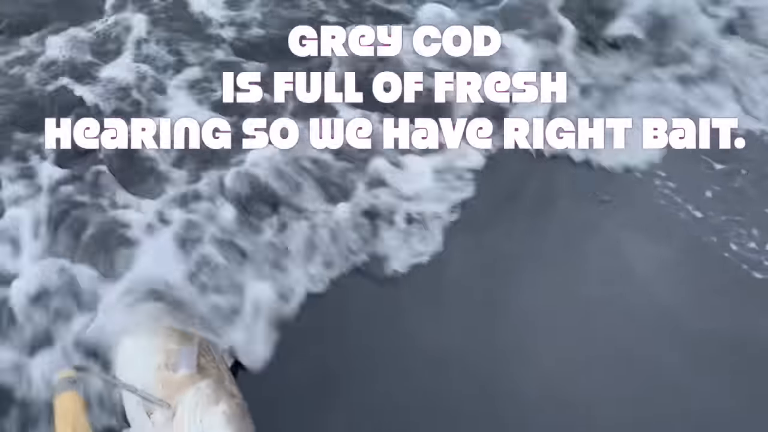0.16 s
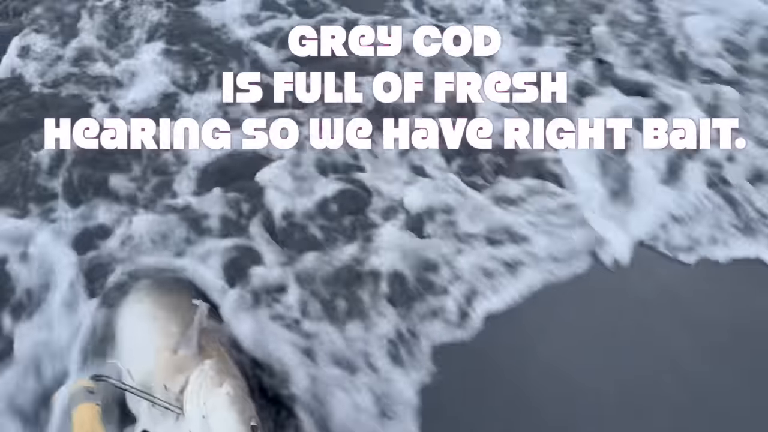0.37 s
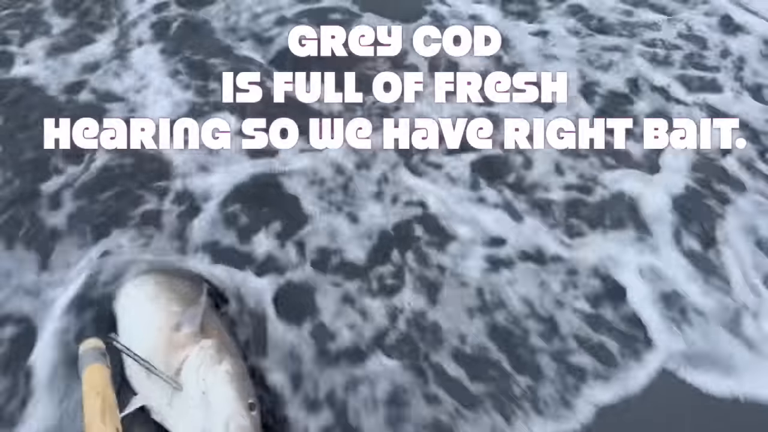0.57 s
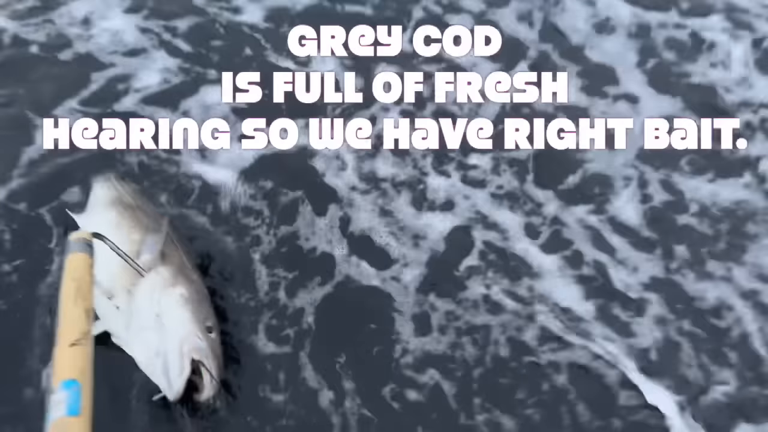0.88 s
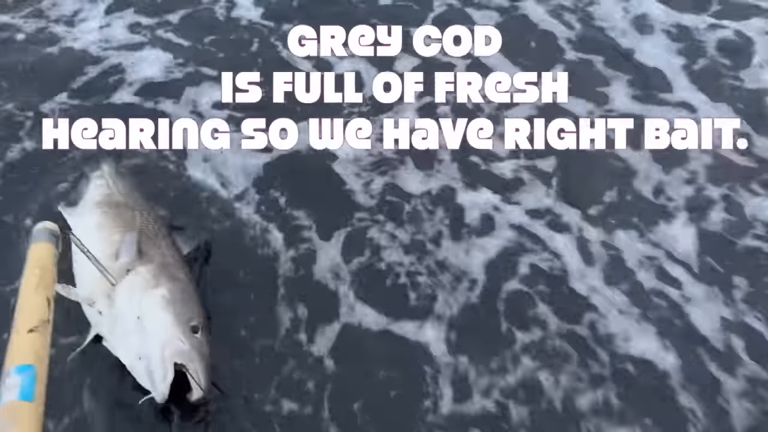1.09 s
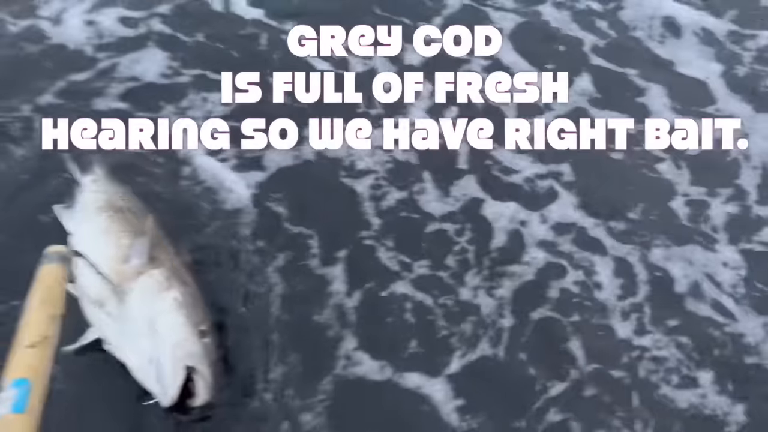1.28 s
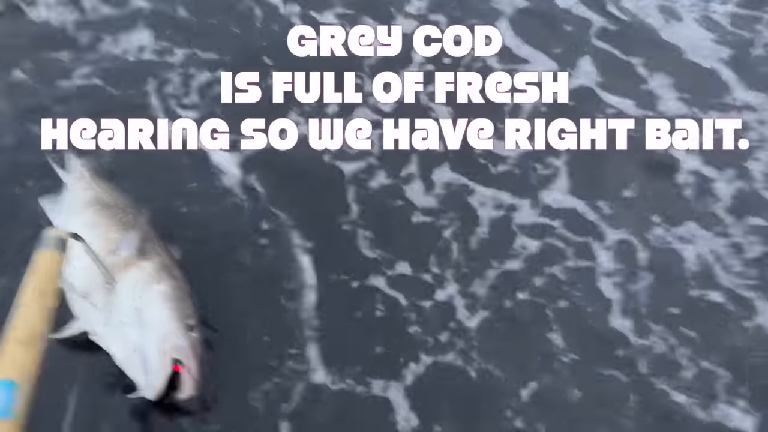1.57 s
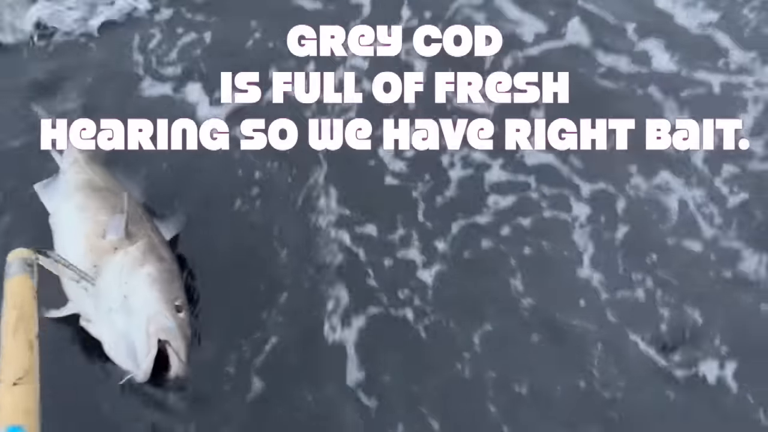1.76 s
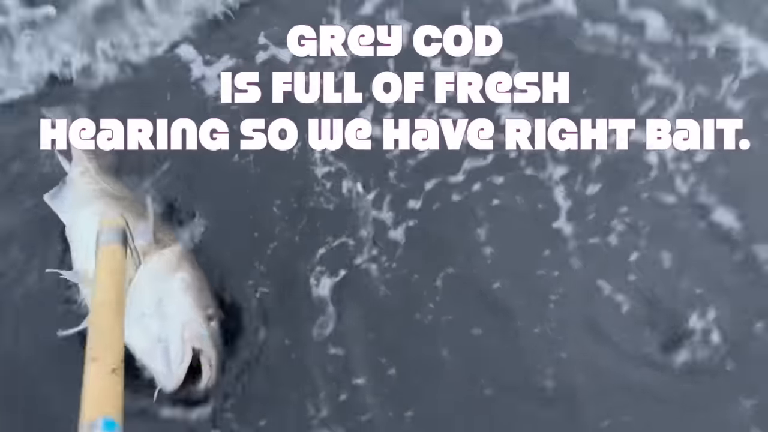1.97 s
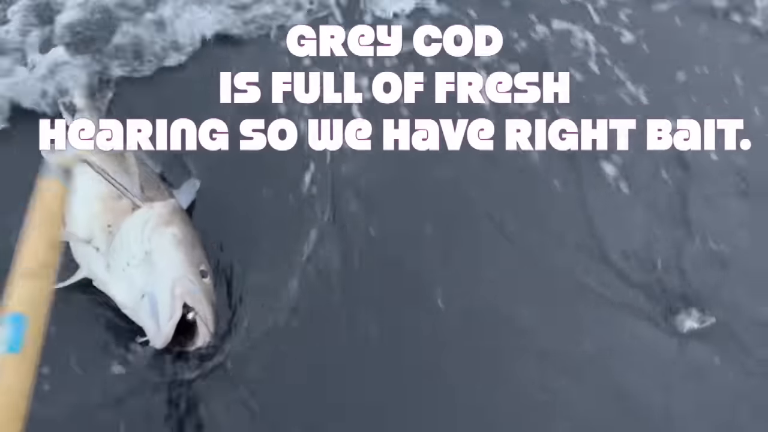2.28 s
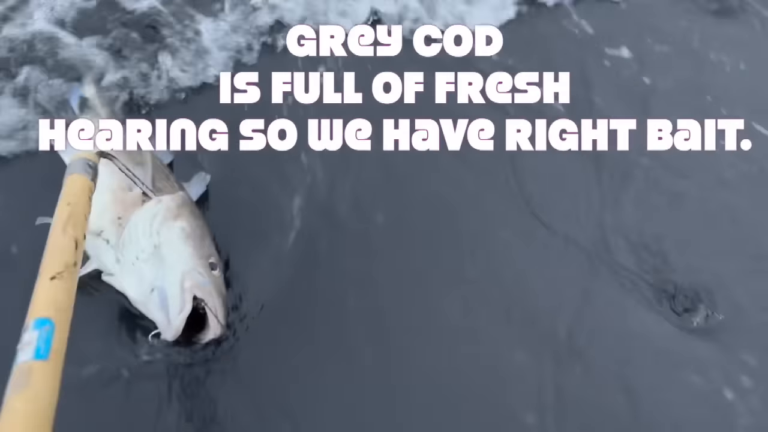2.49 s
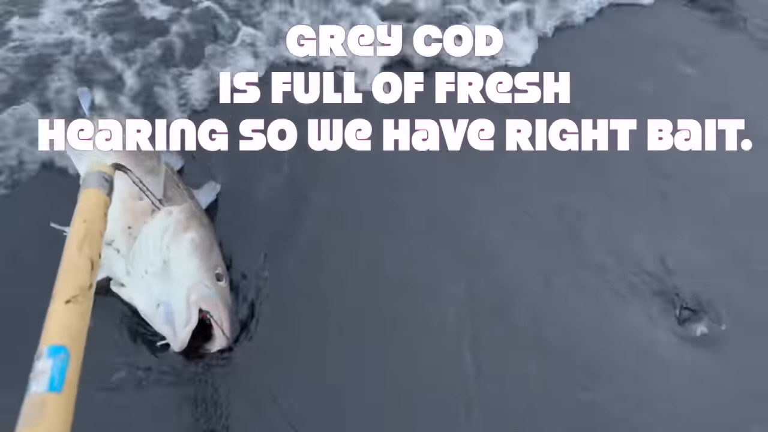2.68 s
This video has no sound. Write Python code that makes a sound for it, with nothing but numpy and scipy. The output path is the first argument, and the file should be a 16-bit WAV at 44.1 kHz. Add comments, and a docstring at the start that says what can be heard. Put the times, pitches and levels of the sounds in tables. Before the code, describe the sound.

Close foamy surf hisses over wet sand, with watery plops, a mid-way swell and a fizzing retreat

```python
"""A small wave runs up a sandy beach close to the microphone: a hiss of bursting foam over a low roar.
Early on, pockets of trapped air plop on the left as falling knocks; drops of spray tick now and then.
The surf swells, and splashes burst out as bands of noise around one pitch.
The wave tumbles over, gulping in short deep throbs, then drains away with a few late plops.
Bubbles ring as decaying sines throughout, louder as the wave passes."""
import sys
import numpy as np
from scipy import signal
from scipy.fft import rfft, irfft
from scipy.io import wavfile
from scipy.ndimage import uniform_filter1d

SR = 44100
rng = np.random.default_rng(int(sys.argv[2]) if len(sys.argv) > 2 else 0)


def int16_out(signal):
    """Quantize to a 16-bit WAV file."""
    q = np.round(np.clip(np.atleast_2d(signal).T, -1, 1) * 32767)
    wavfile.write(sys.argv[1], SR, q.astype(np.int16))


N = 125685
T = np.arange(N) / SR
BIN_HZ = np.arange(1, N // 2 + 2) * SR / N  # starts one bin up, to avoid 0 Hz
LAG_S = 0.000528  # the right side hears the water later
SMALL_LOW_HZ, TOP_HZ = 400, 15900


def undb(db):
    """Decibels to gain."""
    return 10 ** (np.asarray(db) / 20)


def unit(x):
    """Scale to rms 1."""
    return x / np.sqrt(np.mean(x ** 2) + 1e-20)


def at_pitch(hz, points_hz, values):
    """Read a table on a log-frequency axis."""
    return np.interp(np.log(hz), np.log(points_hz), values)


def band(x, low_hz, high_hz, order=8):
    """Band-pass without delay; neighbouring bands add up in power."""
    low_loss = 1 + (low_hz / BIN_HZ) ** (2 * order)
    high_loss = 1 + (BIN_HZ / high_hz) ** (2 * order)
    return irfft(rfft(x, N) / np.sqrt(low_loss * high_loss), N)


def walk(rate_hz):
    """Smooth random wander with rms 1."""
    hold = int(SR / rate_hz)
    steps = np.repeat(rng.standard_normal(400), hold)[:N]
    return unit(uniform_filter1d(steps, hold))


def later(x):
    """The sound as it reaches the far side."""
    return np.interp(T - LAG_S, T, x)


def add(out, start_s, sound):
    """Mix a short sound in at a given time."""
    i = int(np.clip(start_s * SR, 0, N - 1))
    out[:, i:i + sound.shape[1]] += sound[:, :N - i]


# Relative level of the surf over time.
# Each row: time in seconds, then churn, splash, fizz and mist in dB.
WASH_LEVELS = [(0.0, -3.5, -2, 0, -2.5), (0.15, -3, -7.5, -1.3, -3), (0.28, -3, -3, -1.5, -2),
               (0.4, -5, -2, -1, 0), (0.55, -3, -1.5, -1.5, -0.5), (0.68, -6.5, 1, 1, 0.5),
               (0.85, -5, 3, 2.3, 1), (1.05, -4.5, 4.5, 4.5, 2), (1.3, 2, 6.5, 8.5, 4.5),
               (1.45, 3.5, 6, 6, 1.5), (1.62, 3, 3, 6.5, -0.5), (1.76, -5, -2, 5, -0.5),
               (1.88, -2.5, -3, 3.5, -2), (2.08, -1.5, -2.7, 1.8, -3.5), (2.33, -6, -2.5, 2.8, -3),
               (2.55, -3, -3.5, -0.5, -5), (2.72, -5, -6, -3, -4), (2.76, -4, -3, 1.5, -0.5),
               (2.85, -2.5, -2.5, -2, -4.5)]
# Centres of churn, splash, fizz and mist in Hz.
WASH_CENTRES_HZ = [440, 1150, 4400, 10000]


def wash_db(hz):
    """Relative level of the surf over time at one pitch, between the four bands and the table times."""
    rows = np.array(WASH_LEVELS)
    levels_db = [at_pitch(hz, WASH_CENTRES_HZ, row[1:]) for row in rows]
    return np.interp(T, rows[:, 0], levels_db)


# Drops of spray.
# Each row: start in seconds, level in dB before shaping and halving, pitch in Hz, left minus right in dB.
SPRAY_DROPS = [(0.044, -24, 8300, -13), (0.132, -26, 9000, -18.5), (1.074, -24.5, 4530, -2),
               (1.227, -27, 2000, -5), (1.242, -28, 6250, -22.5), (1.979, -23, 7250, 5),
               (2.404, -29, 3800, -11), (2.42, -27.5, 4000, 0), (2.742, -29.5, 4200, 15)]
DROP_DECAY_CYCLES, DROP_WIDTH_OCTAVES, DROP_ATTACK_S = 16.5, 0.2, 0.00093


def drops():
    """Flying drops land with short bright ticks: narrow noise with a fast attack and decay."""
    out, t = np.zeros((2, N)), T[:SR // 20]
    half_width = 2 ** (DROP_WIDTH_OCTAVES / 2)
    for start_s, db, hz, pan_db in SPRAY_DROPS:
        noise = band(rng.standard_normal(N), hz / half_width, hz * half_width, order=4)
        tick = unit(noise)[:len(t)]
        shape = (1 - np.exp(-t / DROP_ATTACK_S)) * np.exp(-t * hz / DROP_DECAY_CYCLES)
        gains = undb([[db + pan_db / 2], [db - pan_db / 2]])
        add(out, start_s, gains * tick * shape / 2)
    return out


PHASE_RISE = 0.058  # extra cycles, as a share, after 4 decay times


def bubble(hz, decay_cycles):
    """One bubble rings down and rises in pitch as it surfaces."""
    t = T[:SR // 20]
    age = t * hz / decay_cycles
    cycles = hz * t * (1 + PHASE_RISE * np.minimum(age, 4) / 4)
    return np.sin(2 * np.pi * cycles) * np.exp(-age)


BUBBLE_LOW_HZ, BUBBLE_HIGH_HZ, BUBBLE_DECAY_CYCLES = 556, 3510, 13.1
BUBBLE_BASE_DB, BUBBLE_SPREAD_DB = -49, 2.5


def bubbles(count=600):
    """Single bubbles of all sizes ring here and there, louder as the wave passes."""
    out, strength_db = np.zeros((2, N)), wash_db(WASH_CENTRES_HZ[1])
    for when, pitch, size, side in rng.random((count, 4)):
        hz = BUBBLE_LOW_HZ * (BUBBLE_HIGH_HZ / BUBBLE_LOW_HZ) ** pitch
        size_db = -BUBBLE_SPREAD_DB * np.log(max(size, .02))
        db = BUBBLE_BASE_DB + strength_db[int(when * N)] + size_db
        pan = np.sqrt([[side], [1 - side]])
        add(out, when * N / SR, undb(db) * pan * bubble(hz, BUBBLE_DECAY_CYCLES))
    return out


# Plops of trapped air.
# Each row: knock peak in seconds, left level in dB, starting pitch in Hz, gurgle level in dB re the knock.
AIR_PLOPS = [(.1272, -16.5, 810, -20), (.184, -22, 450, -13), (.2, -24, 650, -7), (.2087, -14, 737, -27),
             (.321, -25, 646, -19), (.366, -21, 825, -13), (.389, -16.5, 890, -10), (.456, -18.5, 590, -13),
             (.465, -16.5, 630, -23), (.483, -11.5, 790, -27), (.4885, -19, 1080, -25),
             (.597, -18.5, 846, -14), (.661, -20, 770, -18), (.729, -24, 606, -13), (.757, -17, 1070, -20),
             (.941, -20, 515, -27), (2.062, -23, 605, -14), (2.09, -21.5, 825, -21), (2.153, -23, 700, -16),
             (2.218, -20.5, 503, -21), (2.482, -20, 600, -26)]
PLOP_ATTACK_S, PLOP_DECAY_S, PLOP_FALL_S, PLOP_RIGHT_DB = 0.0008, 0.0015, 0.012, -12.5
GURGLE_SPREAD_S, GURGLE_LEAD_S, GURGLE_SPREAD_OCTAVES, GURGLE_DECAY_CYCLES = 0.007, 0.002, 0.3, 3


def plops(count=5):
    """An air pocket shuts with a round, falling knock, amid a few ringing bubbles of like pitch."""
    x = np.zeros((1, N))
    for peak_s, db, hz, gurgle_db in AIR_PLOPS:
        t = T - peak_s
        attack = (np.minimum(t, 0) / PLOP_ATTACK_S) ** 2 / 2
        shape = np.exp(-attack - np.maximum(t, 0) / PLOP_DECAY_S)
        cycles = hz * PLOP_FALL_S * (1 - np.exp(-np.maximum(t / PLOP_FALL_S, -1)))
        x += undb(db) * shape * np.cos(2 * np.pi * cycles)
        for when, pitch in rng.standard_normal((count, 2)):
            ring = bubble(hz * 2 ** (GURGLE_SPREAD_OCTAVES * pitch), GURGLE_DECAY_CYCLES)
            ring_s = peak_s - GURGLE_LEAD_S + GURGLE_SPREAD_S * when
            add(x, ring_s, undb(db + gurgle_db) * ring[None])
    return np.array([x[0], undb(PLOP_RIGHT_DB) * later(x[0])])


# Gulps of the collapsing wave.
# Each row: centre in seconds, peak in dB, pitch in Hz, Gaussian length in seconds.
AIR_GULPS = [(1.585, -42, 207, .009), (1.598, -48, 134, 0.014), (1.603, -32, 269, 0.0085),
             (1.625, -29.5, 284, 0.0041)]


def gulps():
    """The wave folds over large pockets of air, which throb for a few deep cycles."""
    x = np.zeros(N)
    for centre_s, db, hz, length_s in AIR_GULPS:
        t = T - centre_s
        x += undb(db) * np.sin(2 * np.pi * hz * t) * np.exp(-(t / length_s) ** 2 / 2)
    return np.array([x, later(x)])


POPS_PER_S, POP_SPREAD_DB, POP_POWER_SHARE = 900, 3.0, 0.68


def foam():
    """Near bubbles burst at uneven strength over the blur of countless far ones; rms about 1."""
    when, size, sign = rng.random((round(POPS_PER_S * N / SR), 3)).T
    strength = undb(-POP_SPREAD_DB * np.log(np.maximum(size, .005))) * np.sign(sign - .5)
    pops = np.bincount((when * N).astype(int), strength, N)
    blur = rng.standard_normal(N)
    return np.sqrt(POP_POWER_SHARE) * unit(pops) + np.sqrt(1 - POP_POWER_SHARE) * blur


# Splashes.
# Each row: centre in seconds, level at the peak in dB, pitch in Hz, Gaussian length in seconds.
SPLASH_CLOUDS = [(0.664, -42, 1900, 0.053), (1.272, -35, 1590, 0.028), (1.335, -39, 2020, 0.095),
                 (1.37, -34.5, 904, 0.062), (1.446, -38, 338, 0.034), (1.48, -43, 1100, 0.02),
                 (1.59, -38, 300, .04), (2.06, -41, 700, .025), (2.355, -36, 2250, .007),
                 (2.783, -43.5, 2020, 0.035)]
SPLASH_WIDTH_OCTAVES = 0.28


def splashes():
    """Tumbling water drives in a cloud of bubbles of like size, which swells and dies around one pitch."""
    out, half_width = 0, 2 ** (SPLASH_WIDTH_OCTAVES / 2)
    for centre_s, db, hz, length_s in SPLASH_CLOUDS:
        pair = foam() + np.array([foam(), foam()])  # shared plus one per side
        cloud = unit(band(pair, hz / half_width, hz * half_width))
        out = out + undb(db) * np.exp(-((T - centre_s) / length_s) ** 2 / 2) * cloud
    return out


# Relative colour of the surf. Each row: frequency in Hz, density in dB per Hz.
SURF_COLOUR = [(200, -6), (300, 1), (430, 1), (650, 0.5), (950, 2.5), (1300, -3.5), (1600, -4),
               (2200, -5.5), (2650, -8.5), (4200, -11), (5500, -10.5), (7300, -12.5)]
# Relative colour of the finest fizz. Each row: frequency in Hz, density in dB per Hz.
FIZZ_COLOUR = [(9400, -12), (11500, -18.5), (13000, -15), (16000, -17.5)]
# Lower edge of the roar: pitch of the largest bubbles. Each row: time in seconds, pitch in Hz.
LARGEST_BUBBLES = [(0, 244), (.15, 263), (.27, 400), (.36, 346), (.48, 304), (.53, 440), (.72, 395),
                   (1.05, 228), (1.5, 218), (1.62, 185), (1.76, 324), (2.1, 282), (2.35, 355), (2.5, 320),
                   (2.65, 214), (2.85, 227)]
# Stereo picture. Each row: frequency in Hz, left minus right in dB,
# power share that reaches the left first, power share common to both sides.
STEREO_PICTURE = [(286, 1, .15, 0.059), (800, 3.5, 0.65, 0.0041), (1610, -1.5, 0.27, 0.0037),
                  (2340, -1.6, 0.59, 0.012), (3100, 0.5, 0.3, 0.043), (6100, 2, 0.036, 0.01),
                  (8700, -2.8, 0.013, 0.21), (12300, 1, .02, 0.011), (14400, 0, .02, 1)]
SURF_RMS_DB, SWELL_RMS_DB, EDGE_STEEPNESS = -32.5, 0.28, 23.3
FLICKER_1KHZ_RMS_DB, FLICKER_SLOPE = 1.97, 0.32  # flicker is stronger at low pitch


def surf(count=32):
    """Bubble clouds of every size swell with the wave and flicker, above a moving lower edge."""
    centres_hz = np.geomspace(150, 16000, count)
    place = np.interp(np.log(BIN_HZ), np.log(centres_hz), np.arange(count), left=-1)
    picture, colour = np.array(STEREO_PICTURE).T, np.array(SURF_COLOUR + FIZZ_COLOUR).T
    pan_db, straight, common = (at_pitch(BIN_HZ, picture[0], column) for column in picture[1:])
    gain = undb(at_pitch(BIN_HZ, *colour) + np.array([pan_db, -pan_db]) / 2)
    arrival = np.exp(-2j * np.pi * np.outer([0, LAG_S], BIN_HZ))
    deepest_hz = np.interp(T, *np.array(LARGEST_BUBBLES).T)
    swell_db, out = SWELL_RMS_DB * walk(10), 0
    for k, hz in enumerate(centres_hz):
        near, ahead, *around = rfft([foam() for _ in range(4)])
        pair = np.sqrt(straight) * near * arrival + np.sqrt(1 - straight) * np.array(around)
        pair = np.sqrt(common) * ahead + np.sqrt(1 - common) * pair
        window = np.sin(np.pi / 2 * np.maximum(1 - np.abs(place - k), 0))  # equal-power overlap
        cloud = irfft(pair * gain * window, N)
        flicker_db = FLICKER_1KHZ_RMS_DB * (1000 / hz) ** FLICKER_SLOPE * walk(35.08)
        level = undb(wash_db(hz) + swell_db + flicker_db)
        edge = 1 / np.sqrt(1 + (deepest_hz / hz) ** EDGE_STEEPNESS)
        out = out + cloud * level * edge
    return unit(out) * undb(SURF_RMS_DB)


def scene():
    """Surf with its splashes, bubbles, spray, plops and gulps; the small sounds carry no bass."""
    small = band(bubbles() + drops() + plops(), SMALL_LOW_HZ, TOP_HZ)
    return surf() + splashes() + small + gulps()


def record(dry):
    """The microphone adds a very faint rumble and cuts the top."""
    rumble = undb(-93.5) * unit(band(rng.standard_normal(N), 9.4, 210, order=2))
    top_cut = signal.ellip(10, .2, 70, TOP_HZ, fs=SR, output="sos")
    return signal.sosfilt(top_cut, dry + rumble)


dry = scene()
out = record(dry)
int16_out(out)
```